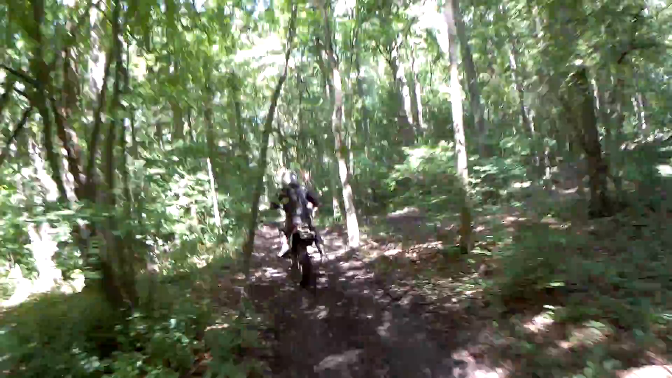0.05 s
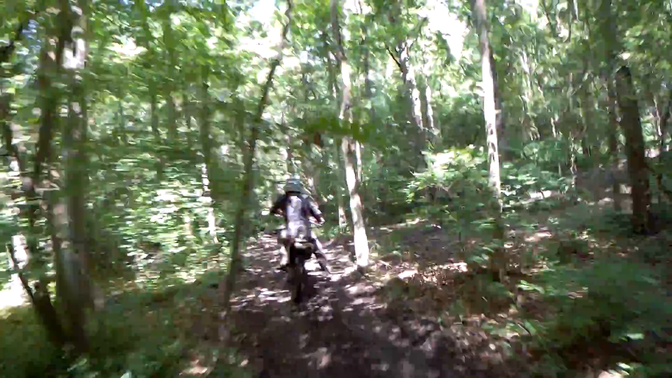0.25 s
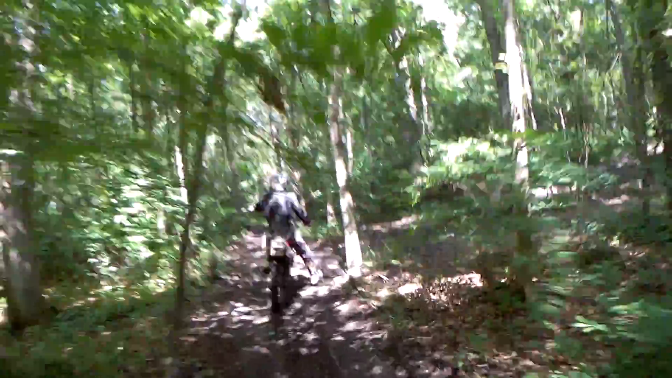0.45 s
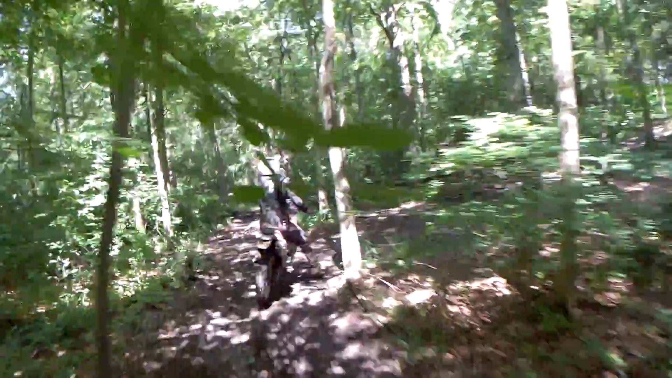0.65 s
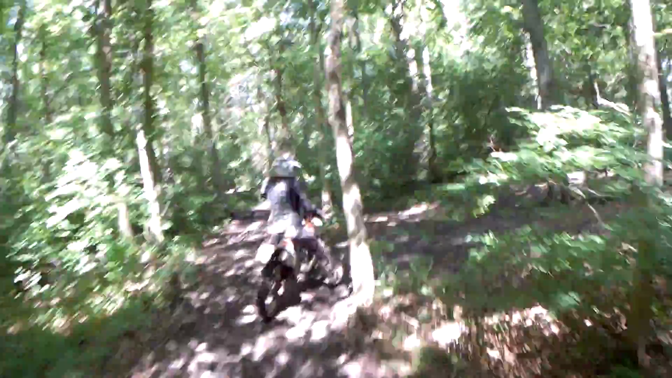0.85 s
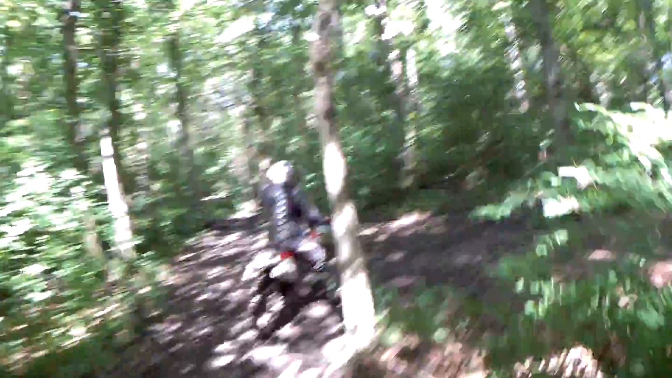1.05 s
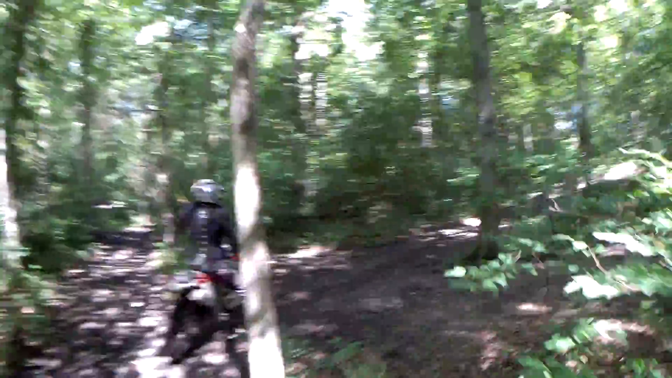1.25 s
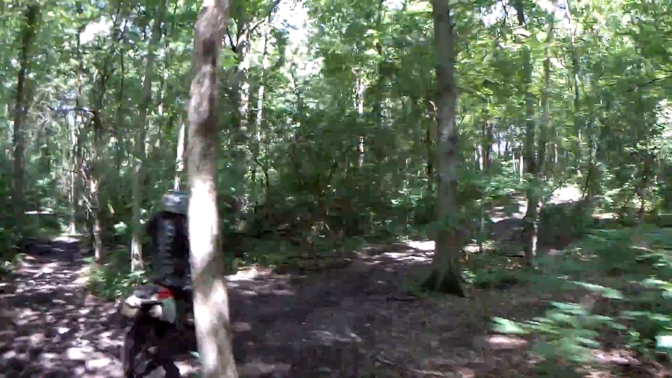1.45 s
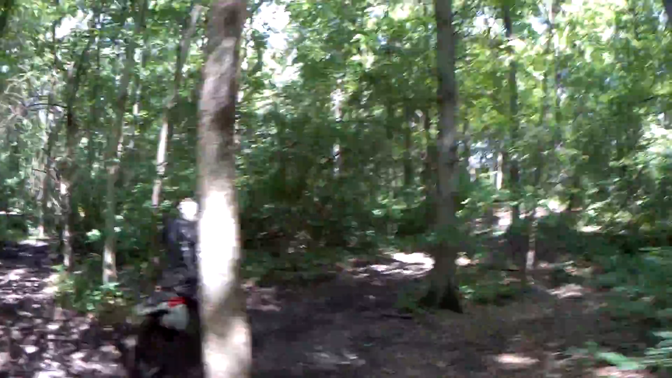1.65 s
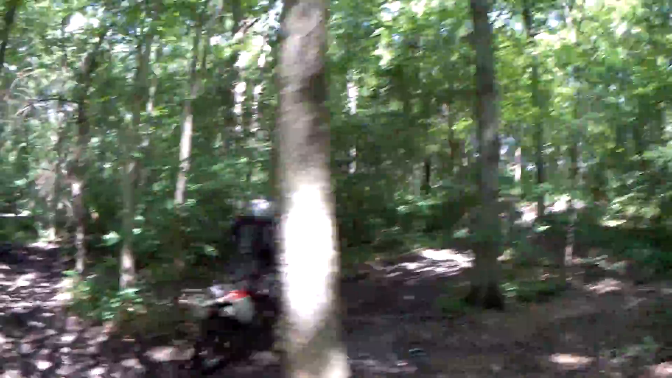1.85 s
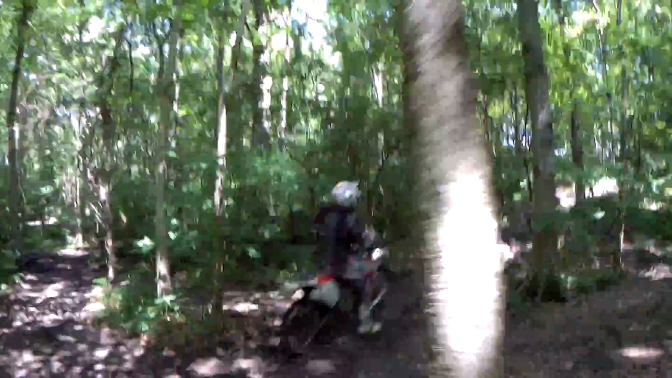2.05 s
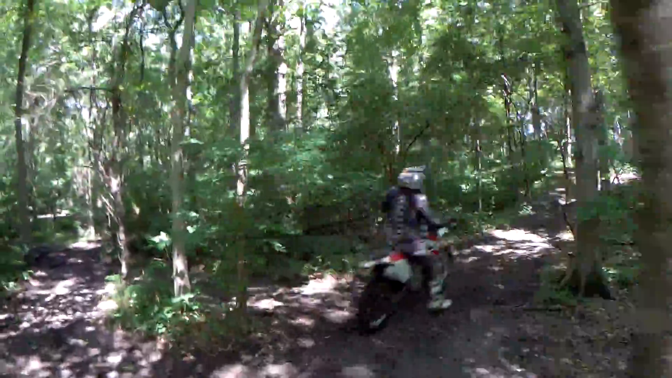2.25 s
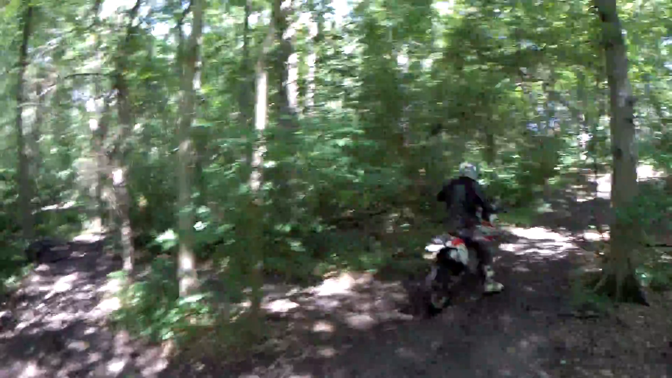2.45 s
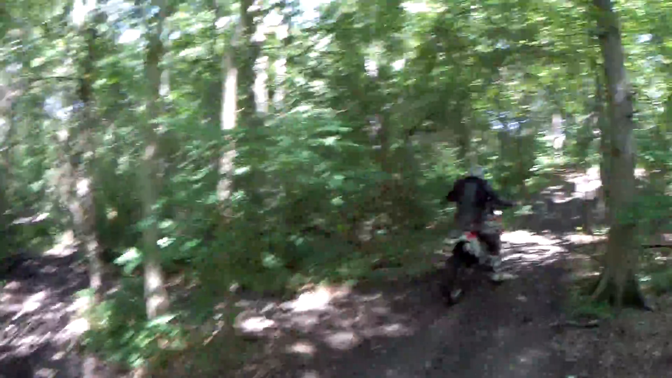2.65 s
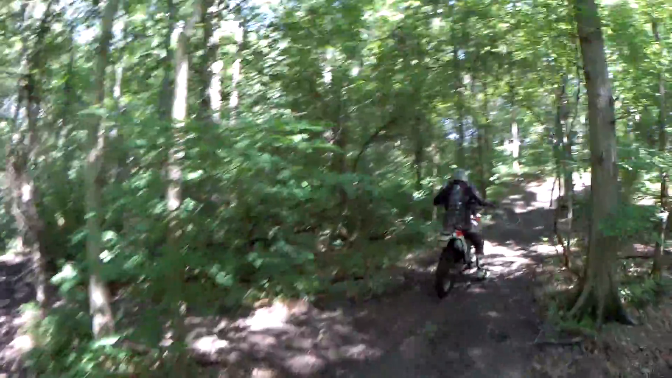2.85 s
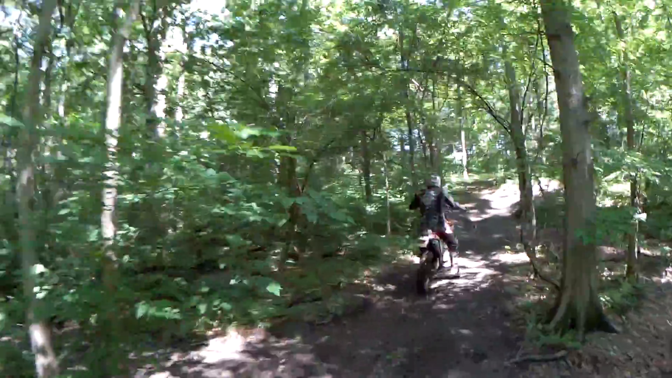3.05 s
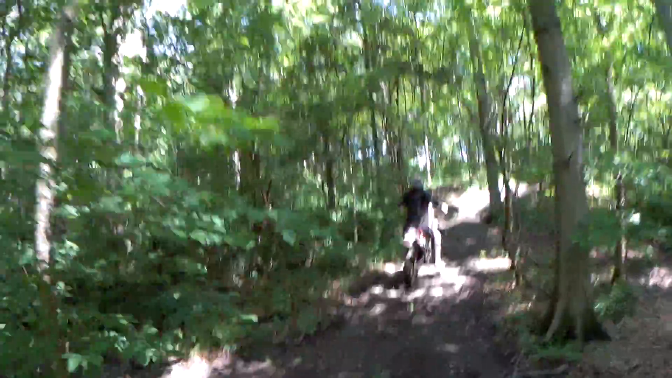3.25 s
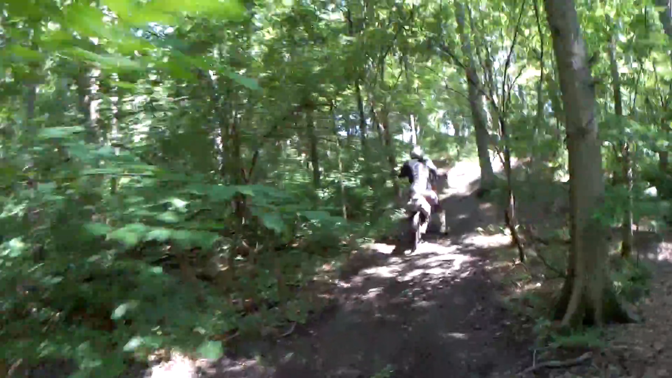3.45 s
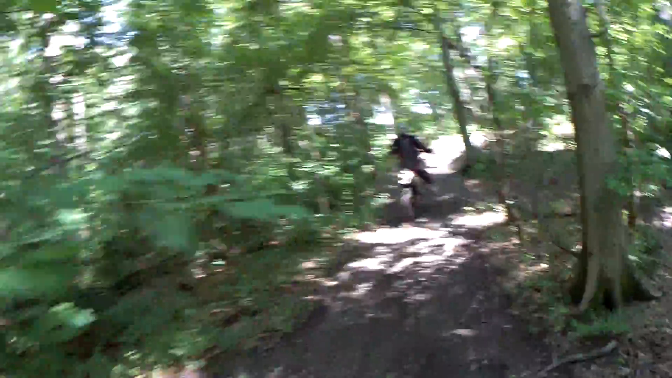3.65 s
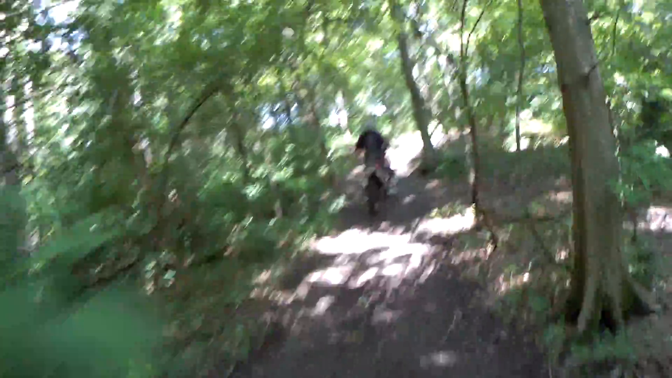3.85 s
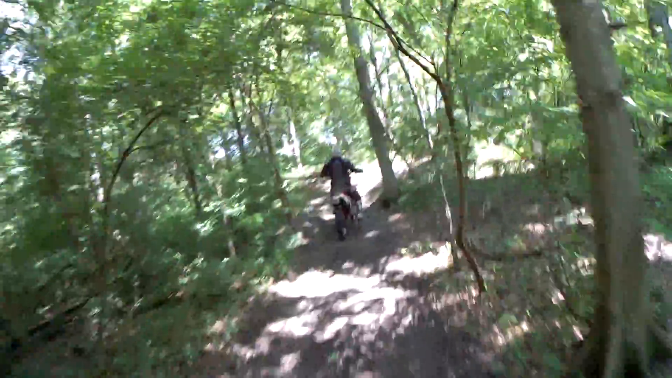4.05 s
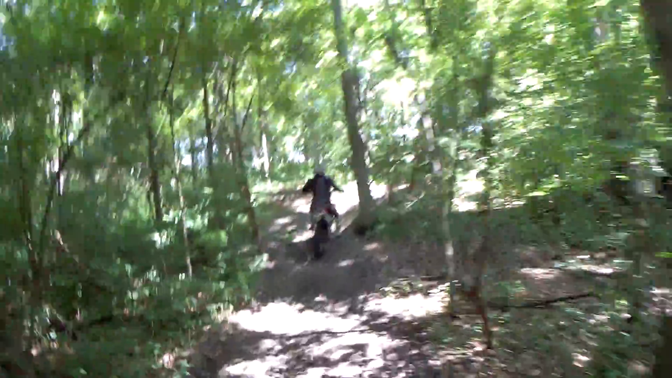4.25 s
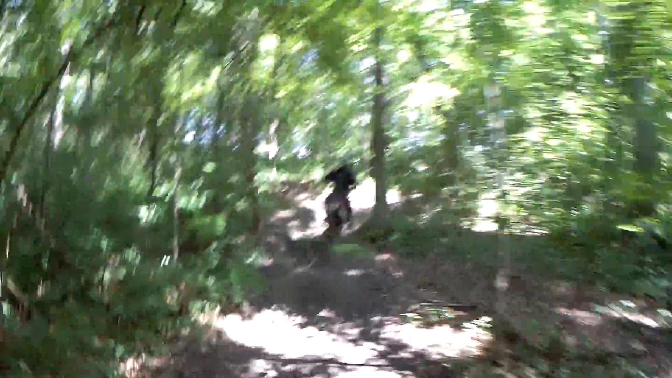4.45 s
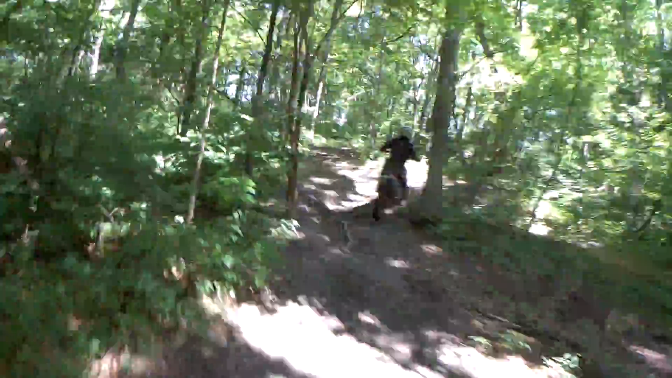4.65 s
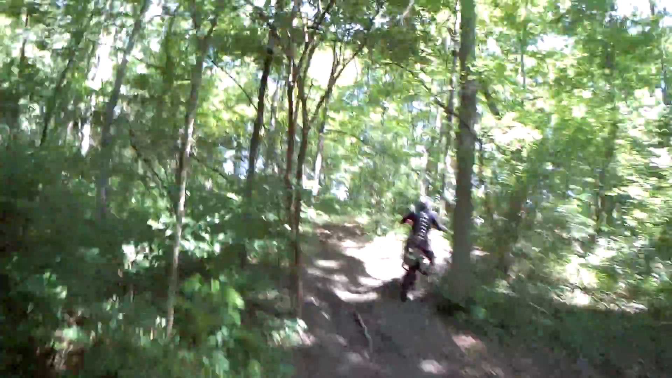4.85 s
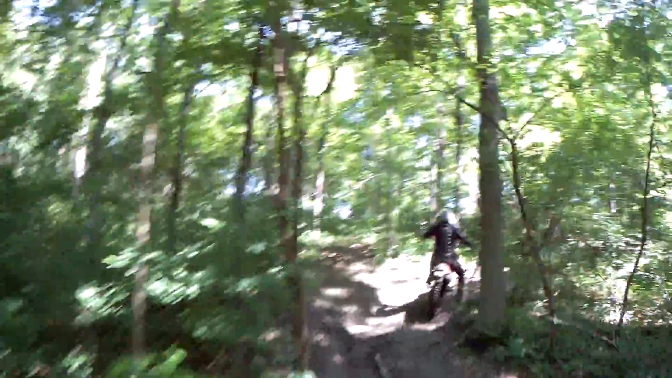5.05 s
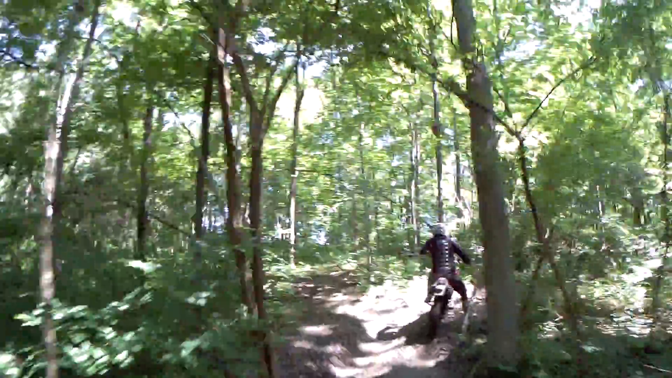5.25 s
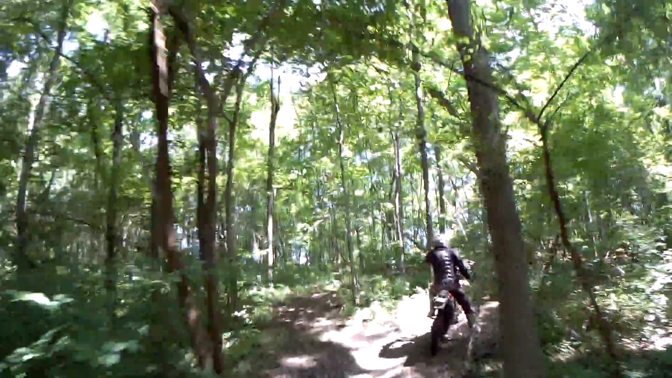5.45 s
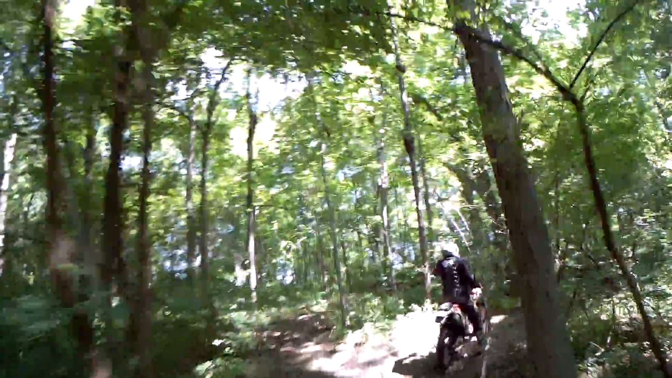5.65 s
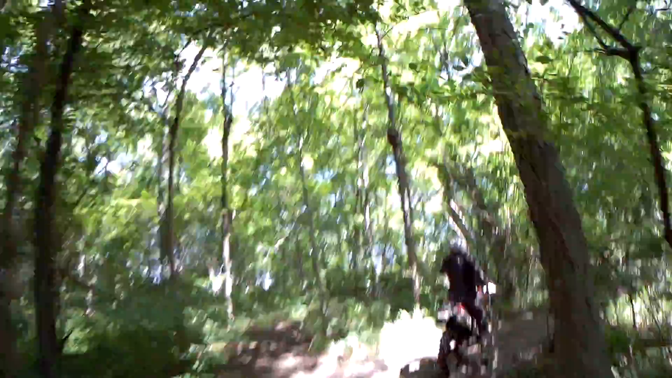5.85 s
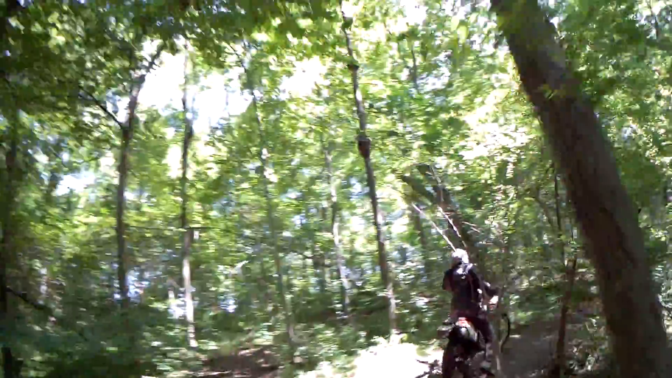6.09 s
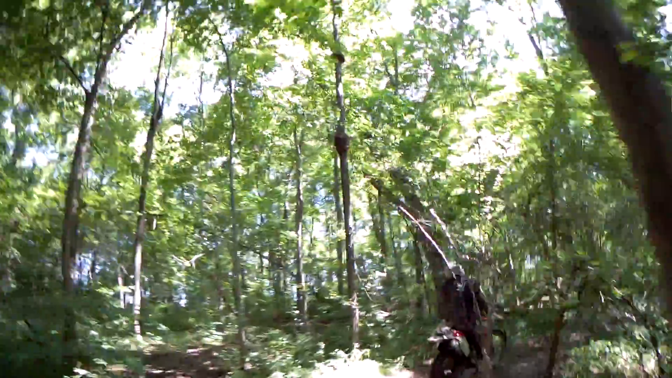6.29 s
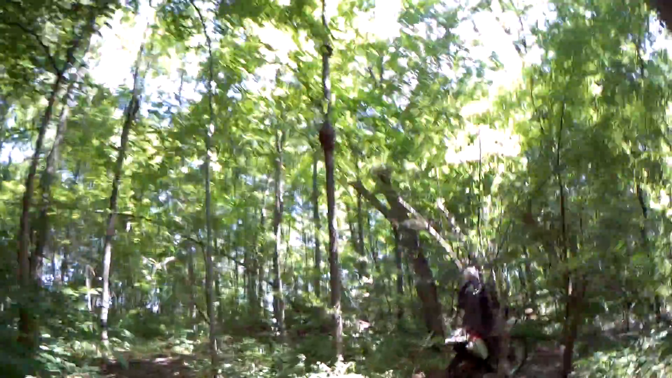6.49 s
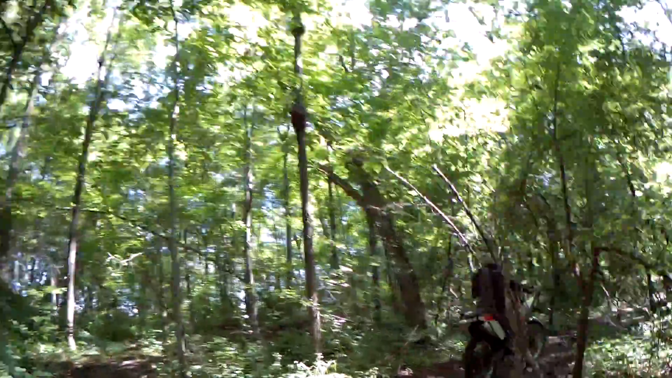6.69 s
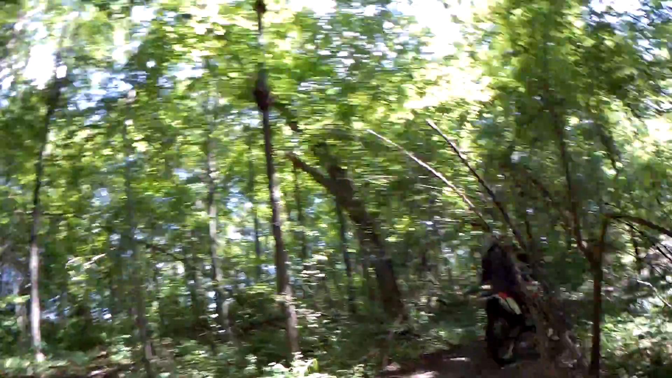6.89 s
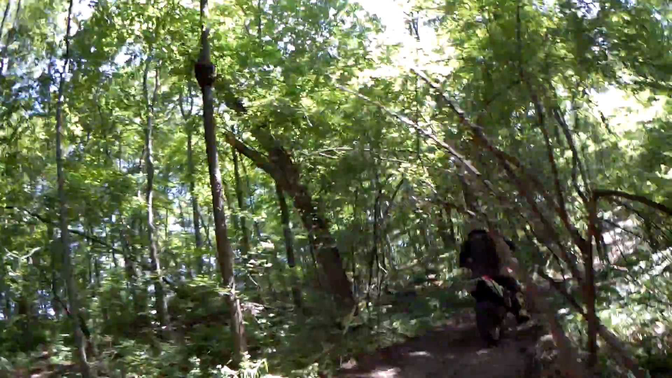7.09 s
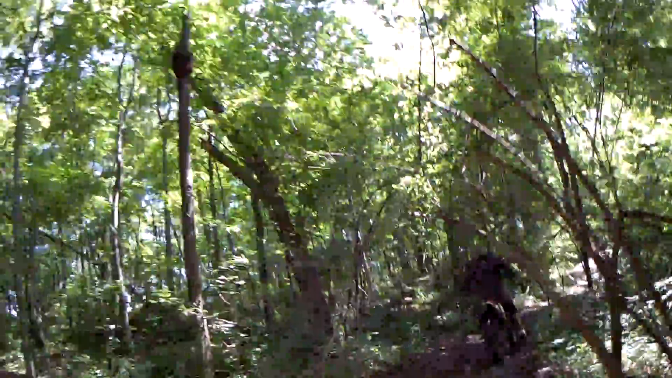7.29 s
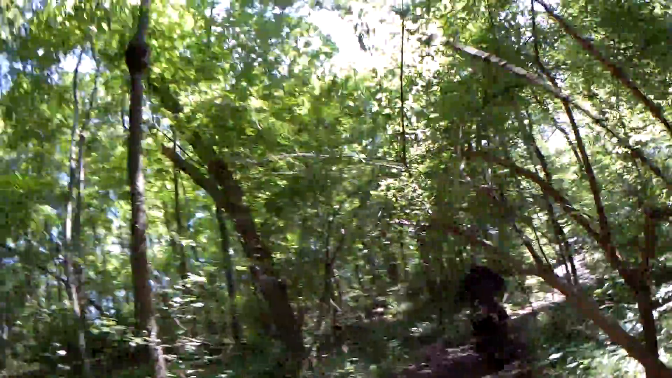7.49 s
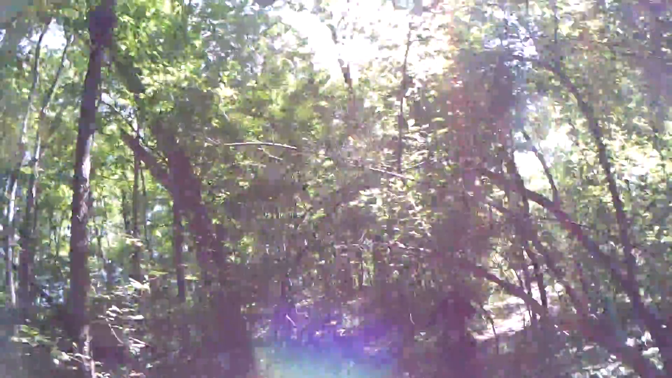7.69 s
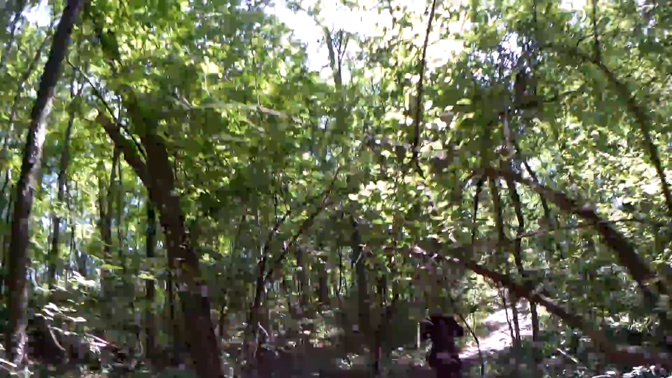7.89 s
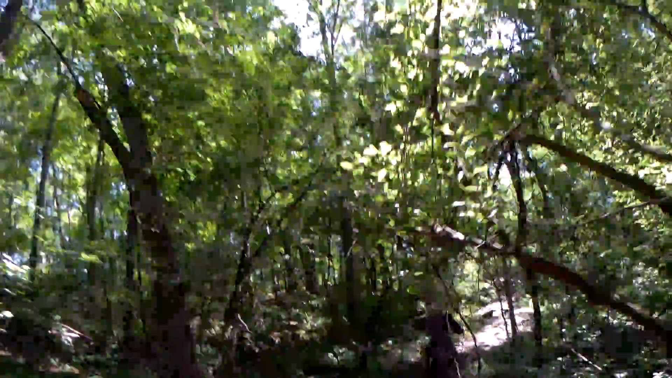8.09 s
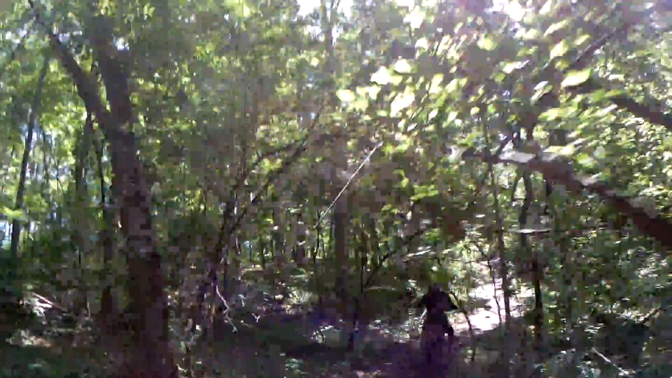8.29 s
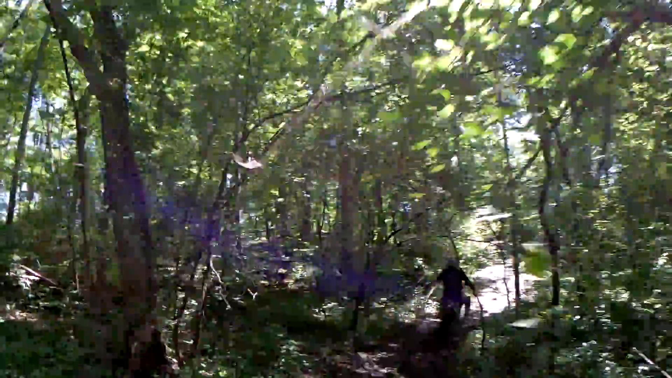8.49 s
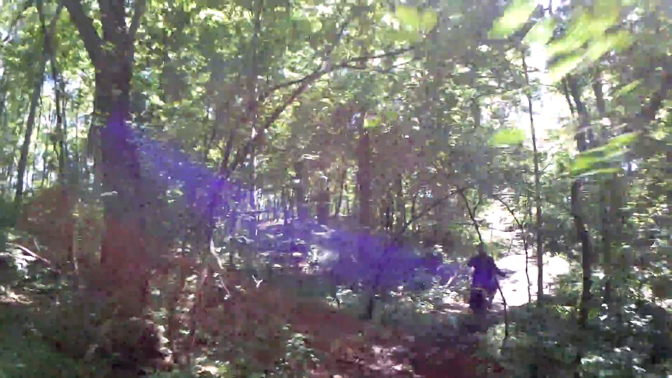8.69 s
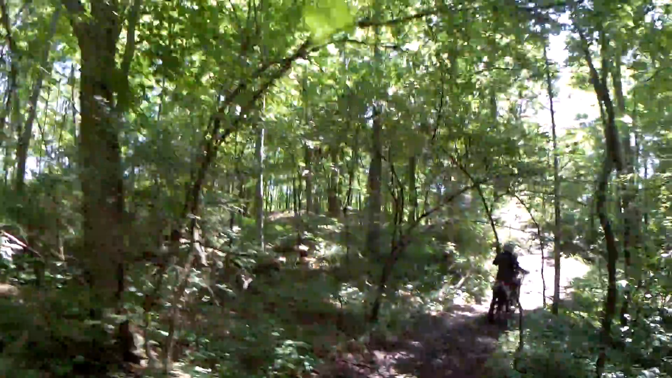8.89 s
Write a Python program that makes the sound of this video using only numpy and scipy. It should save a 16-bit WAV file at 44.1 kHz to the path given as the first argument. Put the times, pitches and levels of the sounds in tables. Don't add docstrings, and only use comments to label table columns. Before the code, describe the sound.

From a camera in a closed housing on a dirt bike, a thumping single-cylinder engine rolls off, clatters at low revs, then bursts hard and eases again before a long strong pull. Another bike ahead barks in short blips. A loud twig whip strikes early, a longer scrape comes midway, and a hollow knock ends it, over wind rumble and rolling tyres on soft woodland earth.

```python
import sys
import numpy as np
from scipy import signal
from scipy.io import wavfile
from scipy.ndimage import uniform_filter1d

SR = 44100
rng = np.random.default_rng(int(sys.argv[2]) if len(sys.argv) > 2 else 0)


def generate_wav(signal):
    frames = np.transpose(np.atleast_2d(signal))
    scaled = np.clip(frames, -1, 1) * 32767
    pcm = np.round(scaled).astype(np.int16)
    wavfile.write(sys.argv[1], SR, pcm)


def volts_from_decibels(level):
    exponent = np.asarray(level, float) / 20
    return 10 ** exponent


N = 393813
CLIP = .63


def rms_one(x):
    return x / np.sqrt(np.mean(x ** 2) + 1e-20)


def in_time(rows):
    s, level = np.transpose(rows)
    return np.interp(np.arange(N) / SR, s, level)


def flywheel(rows):
    return uniform_filter1d(in_time(rows), size=int(.12 * SR), mode="nearest")


def swells(rows, rest_db, rise_db_s, fall_db_s):
    t = np.arange(N) / SR
    levels = [rest_db + 0 * t]
    for start, end, db in rows:
        levels.append(db - rise_db_s * np.maximum(start - t, 0) - fall_db_s * np.maximum(t - end, 0))
    return np.max(levels, axis=0)


def noise():
    return rng.standard_normal(N)


def drift(rate):
    knots = rng.standard_normal(int(N / SR * 60) + 2)
    return np.interp(np.arange(N) / SR * rate, np.arange(len(knots)), knots)


def butter(x, order, hz, kind="low"):
    return signal.sosfilt(signal.butter(order, hz, kind, fs=SR, output="sos"), x)


def resonator(hz, width):
    r = np.exp(-np.pi * width / SR)
    return np.array([1, 0, -1]) * (1 - r * r) / 2, [1, -2 * r * np.cos(2 * np.pi * hz / SR), r * r]


def resonate(x, peaks):
    out = np.zeros(N)
    for k, (hz, width, db) in enumerate(peaks):
        out += (-1) ** k * volts_from_decibels(db) * signal.lfilter(*resonator(hz, width), x + 1e-18)
    return out


def ring(s, db, hz, t60):
    out, first = np.zeros(N), int(s * SR)
    t = np.arange(min(N - first, int(2 * t60 * SR))) / SR
    out[first:first + len(t)] = volts_from_decibels(db - 60 * t / t60) * np.sin(2 * np.pi * hz * t)
    return out


def firings(per_s, start, jitter_s, uneven_db):
    turns = start + np.cumsum(per_s) / SR
    at = np.flatnonzero(np.diff(np.floor(turns)))
    chance = rng.standard_normal((400, 2))[:len(at)]
    late = (jitter_s * SR * chance[:, 0]).astype(int)
    clicks = np.zeros(N)
    clicks[np.clip(at + late, 0, N - 1)] = volts_from_decibels(uneven_db * chance[:, 1])
    return clicks / np.sqrt(per_s), turns % 1


def puff(cycle, depth_db, share):
    return volts_from_decibels(depth_db * np.exp(-cycle / share))


# (delay [s], gain [ratio])
SILENCER_ECHOES = [(.0071, .7), (.0129, -.6), (.0203, .55)]


def silencer(clicks, revs):
    echoes = sum(gain * np.roll(clicks, int(lag * SR)) for lag, gain in SILENCER_ECHOES)
    return rms_one(clicks + (.3 + .7 * revs ** 3) * echoes)


# (frequency [Hz], width [Hz], level [dB])
OWN_PIPE = [(175.4, 45, 11), (233.7, 12, 13.5), (450, 28, 11.5), (473, 210, 8), (632, 37, 9), (810, 89, -3),
            (1129, 46, 2), (1386, 100, 2.5), (2050, 1060, -15.5)]


def own_exhaust(pulses, gas, cycle, revs):
    exhaust = rms_one(butter(resonate(pulses + gas, OWN_PIPE), 2, 3500))
    return exhaust + volts_from_decibels(-11) * np.sin(4 * np.pi * cycle) * revs ** 3


# (multiple of the boom frequency [ratio], width [Hz], level [dB])
AIRBOX_NOTES = [(1, 20.4, 8.5), (1.5, 55, -5.5)]


def airbox_boom(drive, per_s, opened):
    sags_below = 26
    creep_hz = 1.84 * np.maximum(per_s - sags_below, 0)
    sag_hz = 12.9 * np.maximum(sags_below - per_s, 0) * opened
    boom_hz = 308.4 + creep_hz - sag_hz
    out = np.zeros(N)
    for multiple, width, db in AIRBOX_NOTES:
        state = np.zeros(2)
        for i in range(0, N, 512):
            tuned = resonator(multiple * boom_hz[i], width)
            part, state = signal.lfilter(*tuned, drive[i:i + 512], zi=state)
            out[i:i + 512] += volts_from_decibels(db) * part
    return rms_one(signal.lfilter(*resonator(330, 300), out))


# (multiple of the firing rate [ratio], level [dB])
GEAR_TONES = [(15, -13), (19, -13), (22, -13), (23, -14), (31, -9), (33, -6), (35, -7), (36, 0), (37, -7),
              (46, -14)]


def gear_whine(cycle, song):
    tones = sum(volts_from_decibels(db) * np.sin(2 * np.pi * k * cycle + k * k) for k, db in GEAR_TONES)
    return volts_from_decibels(-25 + 1.5 * drift(20)) * song * tones


# (frequency [Hz], width [Hz], level [dB])
CLATTER = [(1071, 84.4, -2), (1257.3, 72, 2), (1578, 170, -13.5), (1996, 120, -20.5)]


def valve_clatter(swell):
    clatter = resonate(noise() * swell * volts_from_decibels(drift(45)), CLATTER)
    return rms_one(butter(clatter, 4, 960, "high"))


# (frequency [Hz], width [Hz], level [dB])
GAS_HISS = [(2530, 1600, -0.5), (3095, 385, 8), (4220, 1100, -7.5), (5100, 820, -1.5), (6720, 520, -6.5)]


def gas_hiss(swell):
    return rms_one(resonate(noise() * swell * volts_from_decibels(2.3 * drift(30)), GAS_HISS))


# (frequency [Hz], width [Hz], level [dB])
CHAIN_RASP = [(1370, 195, 5), (1900, 560, -9)]


def chain_rasp(swell, per_s, revs):
    hard_pull = 14
    pull = np.clip(np.gradient(per_s) * SR / hard_pull, 0, 1) * revs ** 2
    return volts_from_decibels(-31) * pull * rms_one(resonate(noise() * swell, CHAIN_RASP))


# (time [s], firing rate [firings per s])
OWN_SPEED = [(0, 29.9), (.8, 18.1), (1.3, 15.5), (3.3, 14.3), (3.55, 30.6), (3.68, 32.2), (3.95, 20.4),
             (4.1, 20.6), (4.38, 28.8), (4.55, 26.4), (4.72, 29.4), (5.2, 19.3), (6.4, 15), (7.3, 32.2),
             (7.7, 34.5), (8.25, 32.9), (8.6, 34.2), (8.93, 34.2)]
# (time [s], level from full throttle [dB])
OWN_LOAD = [(0, 1.5), (.28, -1.5), (.36, -5), (1.3, -7.5), (1.62, -6.5), (2, -6), (3.3, -7.5), (3.5, -.5),
            (3.75, 1.5), (3.95, -1), (4.65, 1.5), (4.98, -5), (5.5, -8.5), (6.5, -6), (7.1, 0.5), (7.6, 0),
            (8.3, 1.1), (8.93, 1)]
# (start [s], end [s], level [dB])
THROTTLE = [
    (0, .29, -31),
    (3.37, 4.85, -26.5),
    (5.8, 6.6, -35),
    (6.6, 6.9, -29.5),
    (6.9, 8.93, -28),
]


def own_bike():
    load_db, per_s = in_time(OWN_LOAD), flywheel(OWN_SPEED)
    revs = per_s / 34
    shut_db = -39.5
    exhaust_db = swells(THROTTLE, shut_db, rise_db_s=200, fall_db_s=200)
    opened = np.clip((exhaust_db - shut_db) / 6, 0, 1)
    boom_db = -23.5 + 2.21 * load_db
    clatter_db = -24 + 1.164 * load_db
    hiss_db = -46.5 + 1.3 * load_db
    song = volts_from_decibels(-3.5 * np.maximum(33 - per_s, 0))
    clicks, cycle = firings(per_s, start=.14, jitter_s=.00008, uneven_db=1.0)
    pulses = silencer(clicks, revs)
    roughness = np.clip(1.9 - 1.95 * revs, .11, .9)
    gas = roughness * noise() * volts_from_decibels(-3) * puff(cycle, depth_db=7, share=.3)
    swell_db = np.clip(clatter_db + 36, 4, 12) * (1 - .87 * revs ** 2)
    swell = puff((cycle + .12) % 1, swell_db, share=.35)
    out = volts_from_decibels(exhaust_db) * own_exhaust(pulses, gas, cycle, revs)
    out += volts_from_decibels(boom_db - 3.5 * song) * airbox_boom(pulses + .6 * gas, per_s, opened)
    out += gear_whine(cycle, song)
    out += volts_from_decibels(clatter_db - 3 * song) * valve_clatter(swell)
    out += volts_from_decibels(hiss_db) * gas_hiss(swell)
    return out + chain_rasp(swell, per_s, revs)


# (time [s], firing rate [firings per s])
AHEAD_SPEED = [(0, 30.1), (.8, 30.2), (1.02, 36.4), (1.3, 38.2), (1.42, 32), (1.62, 46.2), (1.79, 47.2),
               (1.95, 35), (2.22, 28.2), (3.2, 34.2), (3.6, 30.4), (5.1, 37.2), (5.85, 24), (6.12, 35.4),
               (6.9, 38.8), (7.6, 38.2), (8.93, 38.7)]
# (time [s], level [dB])
AHEAD_PRESENCE = [(0, 0.5), (.35, -2), (.8, -3.5), (1.0, .3), (1.7, 0), (2.2, 0.5), (3.3, 0), (3.6, -3.5),
                  (4.6, 0), (5.0, -12), (5.45, -14), (5.9, -2), (6.6, 3.5), (7.3, -2), (7.6, 1),
                  (8.93, -2.5)]
# (start [s], end [s], level [dB])
BLIPS = [
    (1.1, 1.3, -37.5),
    (1.6, 1.85, -30.5),
    (2.2, 3.2, -40),
    (6.1, 6.95, -32.5),
]
# (frequency [Hz], width [Hz], level [dB])
AHEAD_PIPE = [(106, 16, -29), (158.9, 16.5, -1), (250, 27, -12.5)]
# (frequency [Hz], width [Hz], level [dB])
AHEAD_BARK = [(422, 32.4, 1.5), (585, 89, -5.5), (1100, 120, -12.5)]
# (frequency [Hz], width [Hz], level [dB])
WHIRR = [(2090, 440, 3.5), (4170, 400, -0.5), (6300, 590, -8.5)]


def bike_ahead():
    near_db = in_time(AHEAD_PRESENCE)
    bark_db = swells(BLIPS, rest_db=-44, rise_db_s=39, fall_db_s=40)
    clicks, cycle = firings(flywheel(AHEAD_SPEED), start=.96, jitter_s=.00012, uneven_db=1.0)
    low = rms_one(resonate(resonate(clicks, AHEAD_PIPE), [(184.5, 108, 0)]))
    bark = rms_one(resonate(clicks, AHEAD_BARK))
    whirr = rms_one(resonate(noise() * puff(cycle, depth_db=7.5, share=0.19), WHIRR))
    whirr_db = -51.5 + 0.72 * near_db + 0.18 * (bark_db - bark_db.mean())
    return volts_from_decibels(-33 + 1.6 * near_db) * low + volts_from_decibels(whirr_db) * whirr + volts_from_decibels(bark_db) * bark


# (time [s], length [s], scrape over clipping [dB], hollow knock [dB], mount ring [dB])
WHIPS = [
    (.796, .054, 30, 30, -3),
    (4.741, .065, 22, 22, -12),
    (4.806, .062, 8, 2, -5),
    (4.979, .008, 3, 2, -15),
    (8.903, .024, 9, 23, -22),
]
# (frequency [Hz], width [Hz], level [dB])
SCRAPE = [(344, 104, -1), (1222, 247, 15.5), (3500, 1000, -11)]
# (frequency [Hz], time to die by 60 dB [s], level [dB])
MOUNT = [(43.3, 0.6, -17.5), (93.6, 0.29, 3), (147.6, 0.6, -11), (285, 0.16, 0.5)]


def twigs():
    t, out = np.arange(N) / SR, np.zeros(N)
    scrape = rms_one(butter(resonate(noise(), SCRAPE), 2, 5000))
    grip = np.repeat(rng.standard_normal(N // 160 + 1), 160)[:N]
    scrape = scrape * volts_from_decibels(5 * grip)
    hollow = rms_one(resonate(noise(), [(730, 130, 0)]))
    push = rms_one(butter(noise(), 2, [40, 300], "band"))
    for s, length, scrape_db, hollow_db, ring_db in WHIPS:
        span = slice(int(s * SR), int((s + .3) * SR))
        gone = np.clip((t[span] - s) / length, 0, 1)
        after = np.clip(t[span] - s - length, 0, 1)
        out[span] += volts_from_decibels(scrape_db - 11 * gone - 8000 * after) * scrape[span]
        out[span] += volts_from_decibels(hollow_db - 30 * gone - 2000 * after) * hollow[span]
        push_db = 31 - .7 * max(scrape_db, hollow_db) - 1030 * after
        out[span] += np.sqrt(gone) * (length / .06) ** 1.5 * volts_from_decibels(push_db) * push[span]
        out += sum(ring(s + length, ring_db + db, hz, t60) for hz, t60, db in MOUNT)
    return CLIP * out


# (time [s], peak level [dB], frequency [Hz])
TAPS = [(0.1894, -46, 2680), (0.7723, -27, 3630), (3.887, -25, 4340), (4.033, -54, 3150),
        (4.9044, -40, 2820), (8.761, -21, 2100), (8.82, -15, 1970), (8.8344, -20, 2370)]
# (time [s], peak level [dB], frequency [Hz])
JOLTS = [(0.008, -13, 97), (4.657, -7, 150), (7.019, -16, 110), (7.278, -16, 111), (7.398, -18, 100),
         (7.98, -19, 115), (8.816, -11, 330), (8.833, -3, 400), (4.9, -7, 270), (5.0, -9, 230)]


def bumps():
    taps = sum(ring(s, db, hz, 0.0099) for s, db, hz in TAPS)
    return taps + sum(ring(s, db - 2, hz, 12 / hz) for s, db, hz in JOLTS)


# (start [s], end [s], level [dB])
GUSTS = [
    (0, .05, -29.5),
    (3.65, 3.8, -38.5),
    (4.75, 4.9, -25),
    (6.8, 7.45, -35),
    (8.7, 8.93, -39.5),
]


def wind():
    rumble = rms_one(butter(noise(), 2, [60, 140], "band"))
    buffet = rms_one(butter(noise(), 2, [15, 38], "band"))
    gust_db = swells(GUSTS, rest_db=-42, rise_db_s=48, fall_db_s=55)
    return volts_from_decibels(gust_db + 2.9 * drift(8.1)) * (rumble + volts_from_decibels(-1.5) * buffet)


# (frequency [Hz], width [Hz], level [dB])
TYRES = [(173, 67, -36), (318, 20.4, 2.5), (483, 510, -15.5), (840, 82, -5)]


def tyres():
    return volts_from_decibels(-40 + 2 * drift(8)) * rms_one(resonate(noise(), TYRES))


def scene():
    return (own_bike() + bike_ahead() + twigs() + bumps() + wind() + tyres())[None]


# (start [s], end [s])
DULL_MOMENTS = [
    (4.7, 4.775),
    (4.95, 5.02),
    (8.88, 8.922),
]


def overload(dry):
    clipped = dry / (1 + np.abs(dry / CLIP) ** 8) ** (1 / 8)
    dull = signal.sosfiltfilt(signal.butter(8, 8600, fs=SR, output="sos"), clipped)
    t = np.arange(N) / SR
    return np.where(sum((t > start) & (t < end) for start, end in DULL_MOMENTS), dull, clipped)


def top_cut(x):
    return signal.sosfilt(signal.butter(12, 15970, fs=SR, output="sos"), x)


def record(dry):
    hiss = volts_from_decibels(-57) * noise()
    mix = butter(overload(dry) + hiss, 4, 14500)
    return top_cut(mix)


dry = scene()
out = record(dry)
generate_wav(out)
```